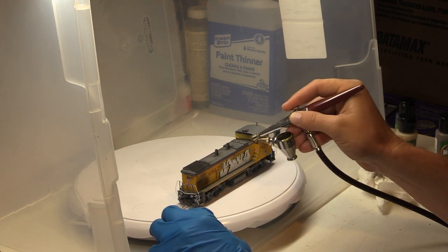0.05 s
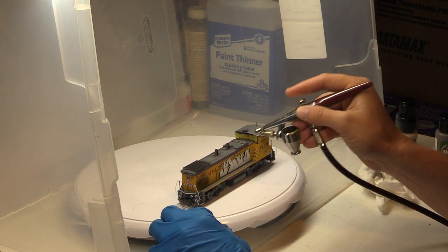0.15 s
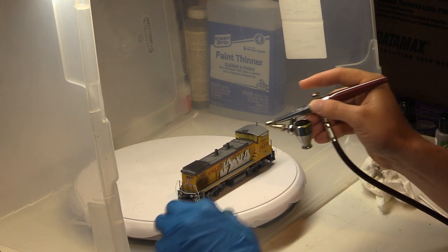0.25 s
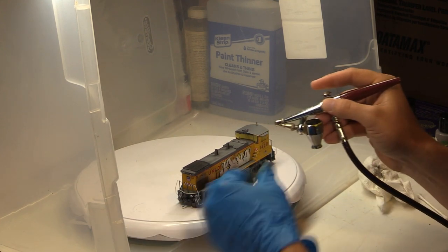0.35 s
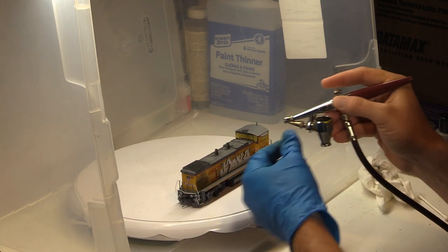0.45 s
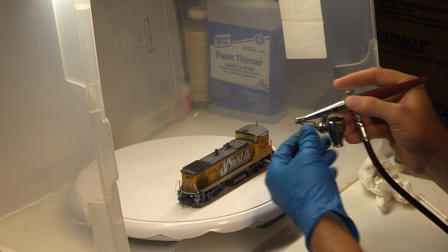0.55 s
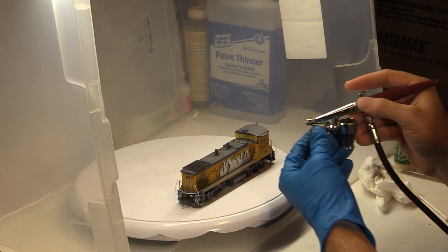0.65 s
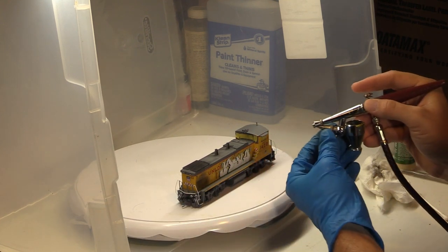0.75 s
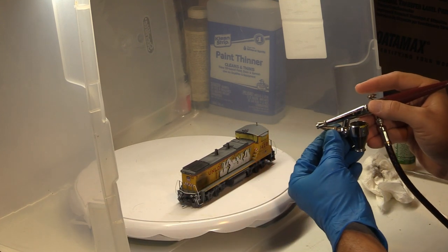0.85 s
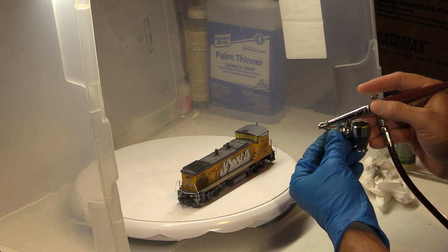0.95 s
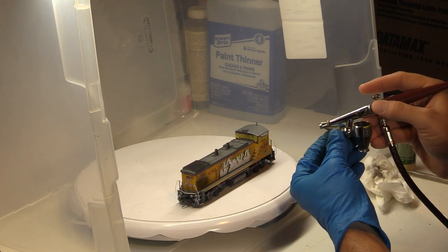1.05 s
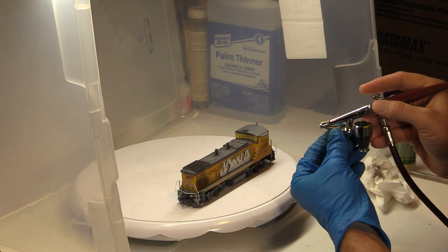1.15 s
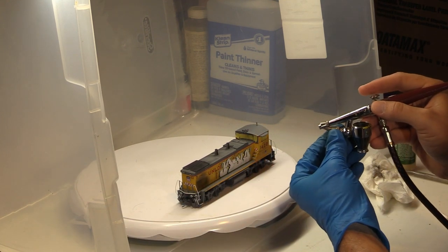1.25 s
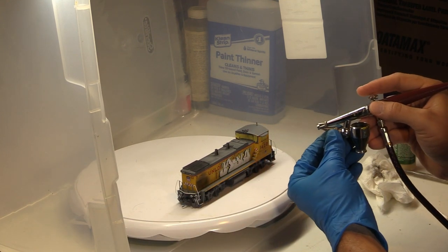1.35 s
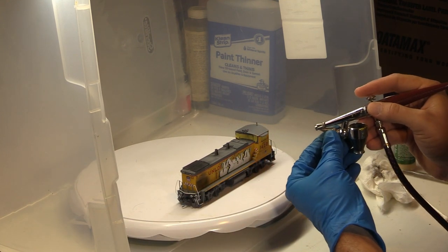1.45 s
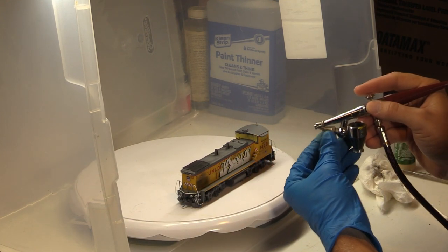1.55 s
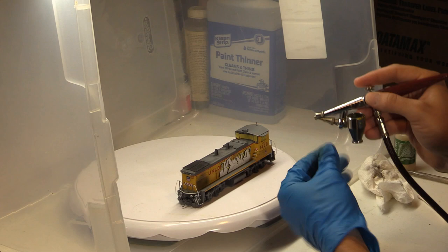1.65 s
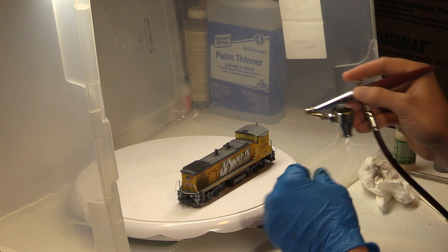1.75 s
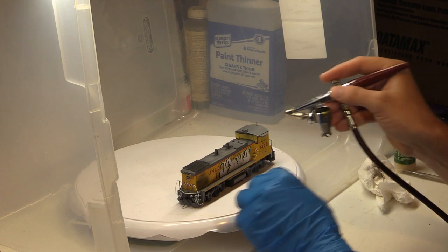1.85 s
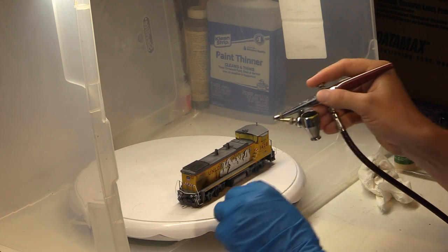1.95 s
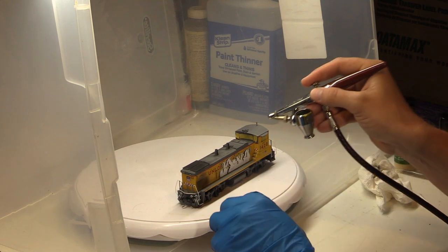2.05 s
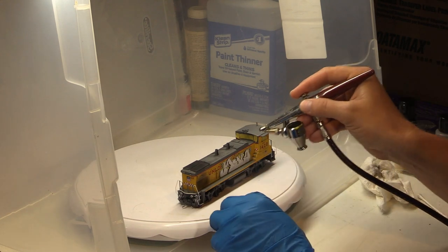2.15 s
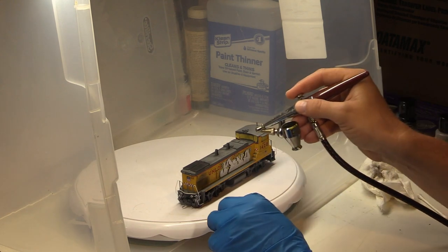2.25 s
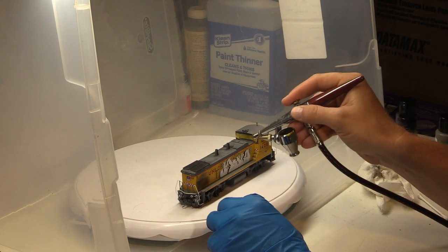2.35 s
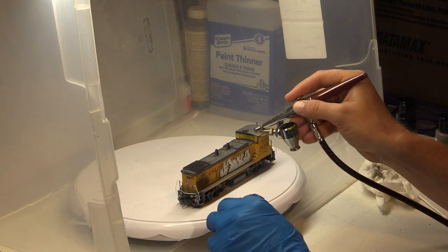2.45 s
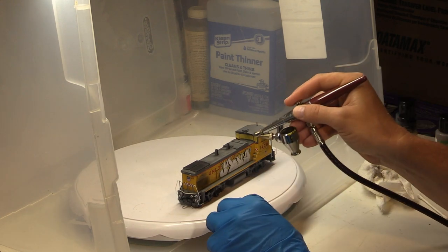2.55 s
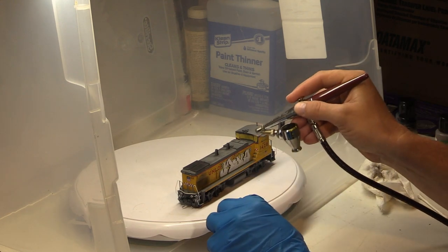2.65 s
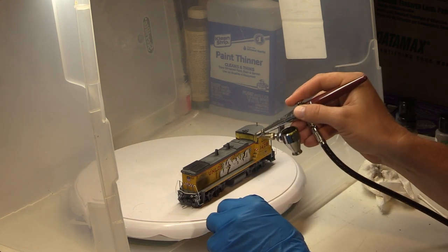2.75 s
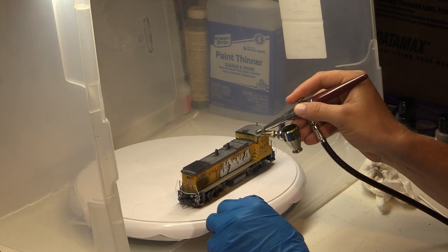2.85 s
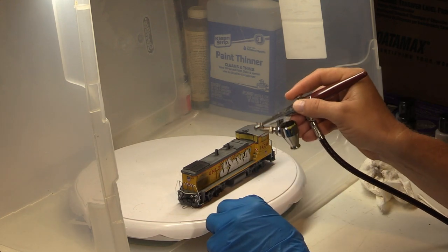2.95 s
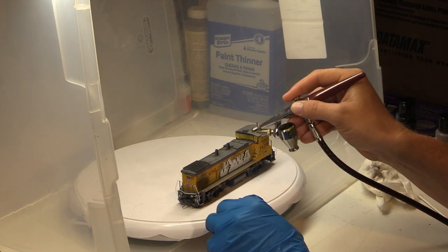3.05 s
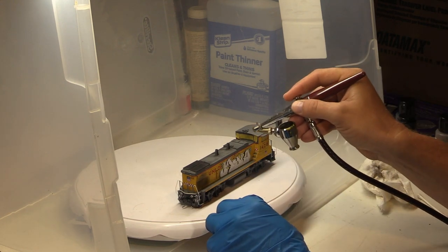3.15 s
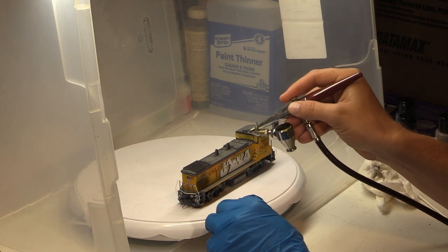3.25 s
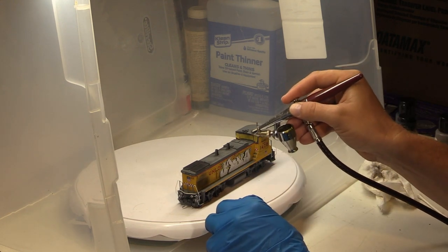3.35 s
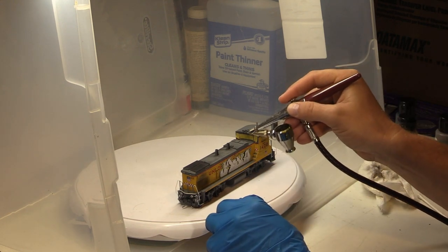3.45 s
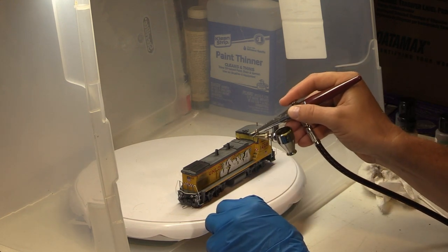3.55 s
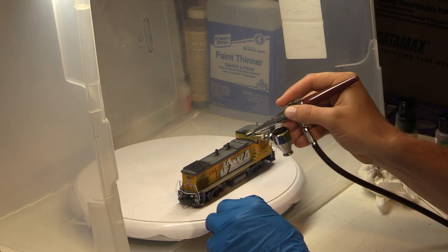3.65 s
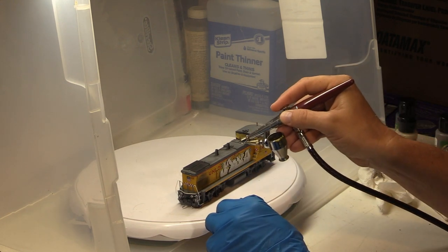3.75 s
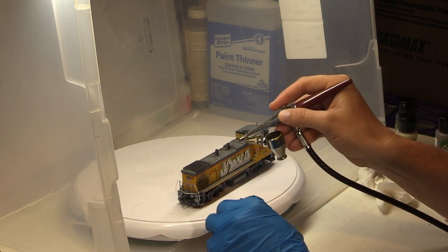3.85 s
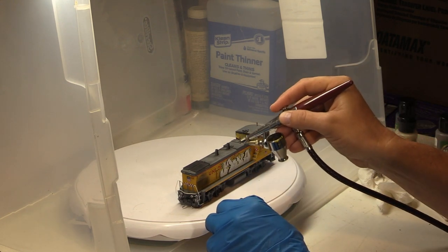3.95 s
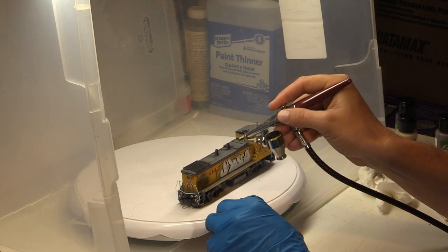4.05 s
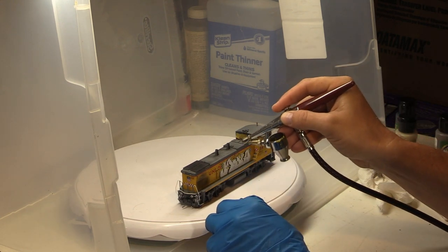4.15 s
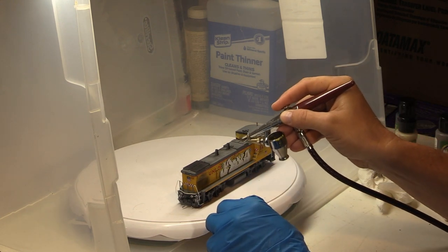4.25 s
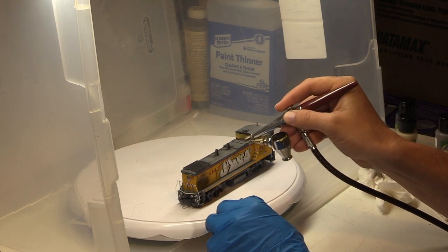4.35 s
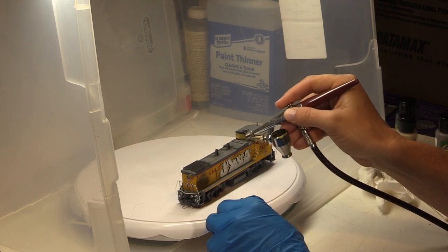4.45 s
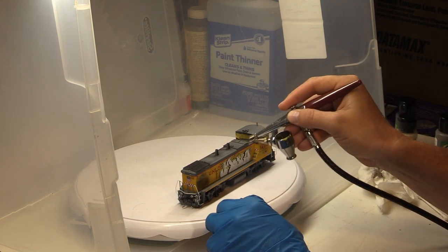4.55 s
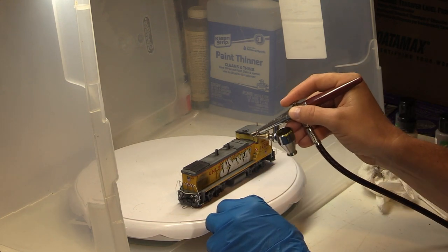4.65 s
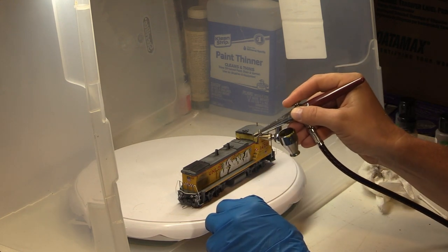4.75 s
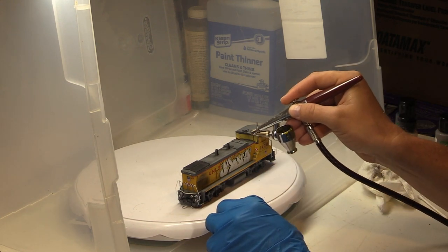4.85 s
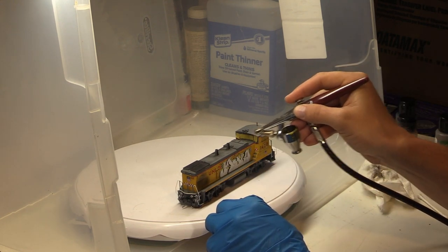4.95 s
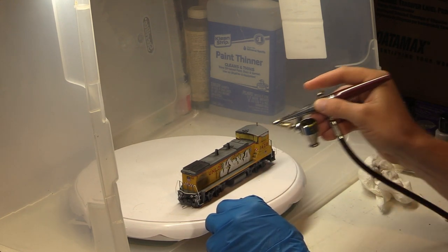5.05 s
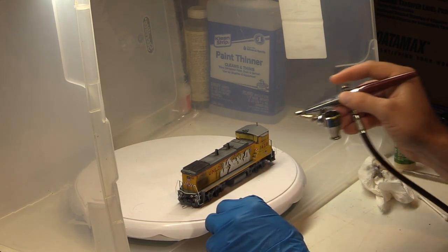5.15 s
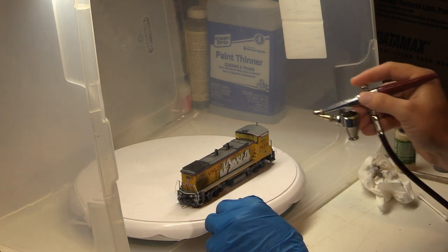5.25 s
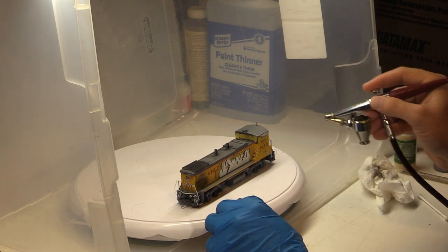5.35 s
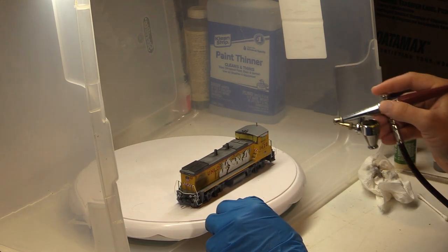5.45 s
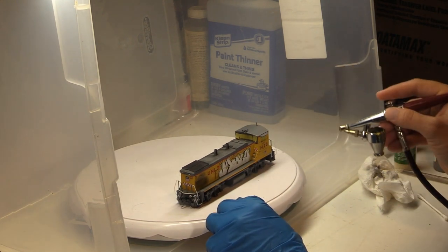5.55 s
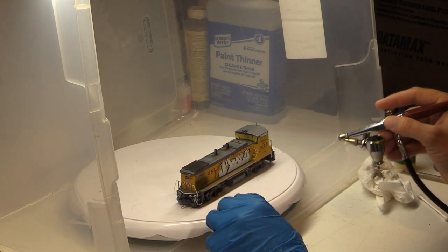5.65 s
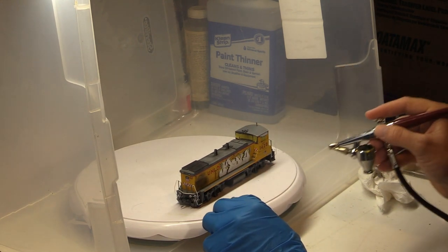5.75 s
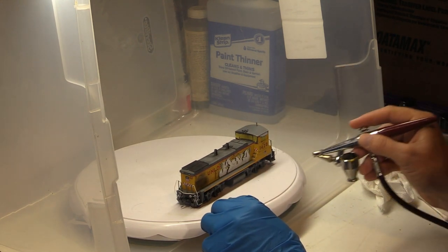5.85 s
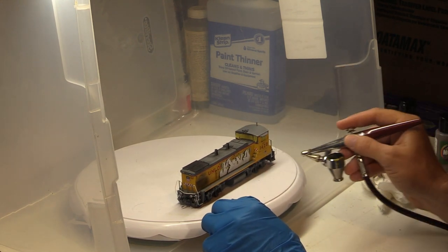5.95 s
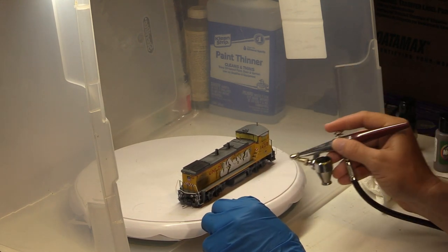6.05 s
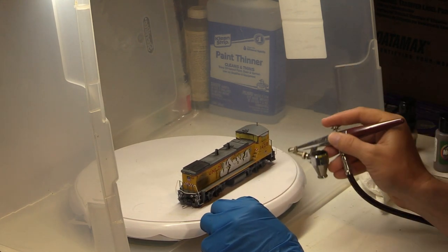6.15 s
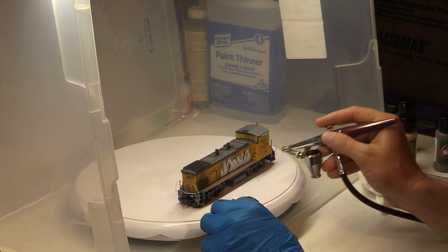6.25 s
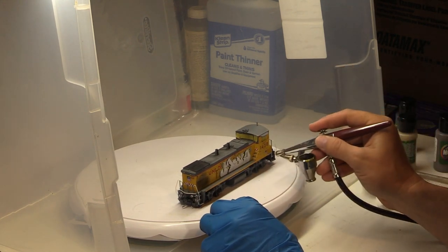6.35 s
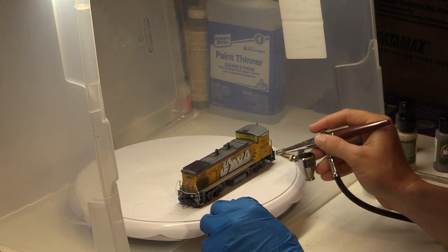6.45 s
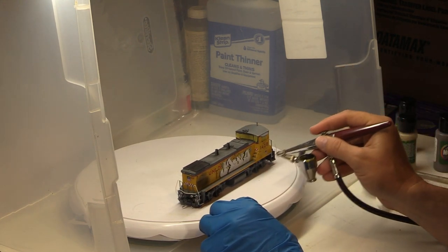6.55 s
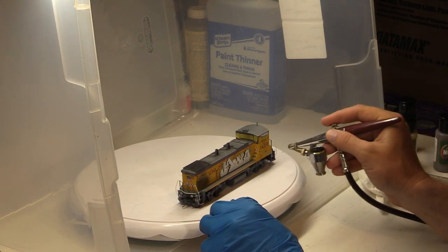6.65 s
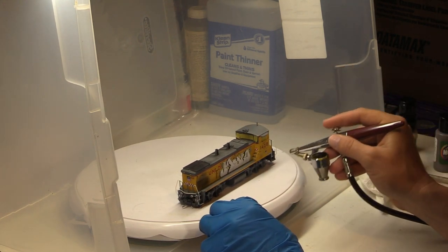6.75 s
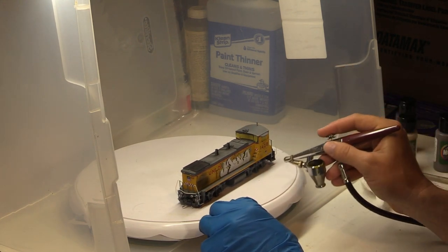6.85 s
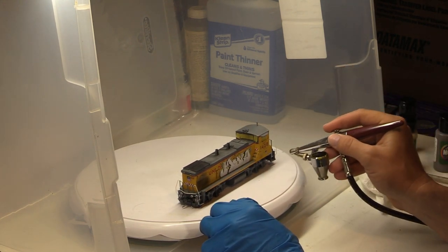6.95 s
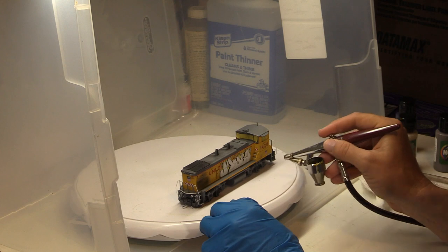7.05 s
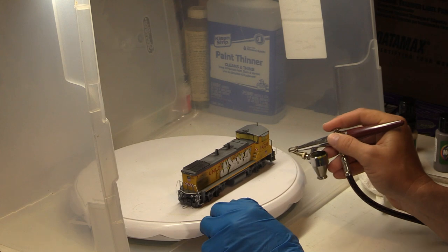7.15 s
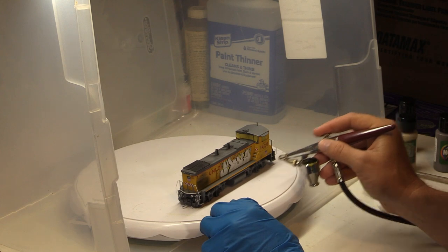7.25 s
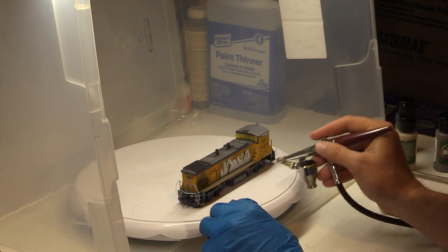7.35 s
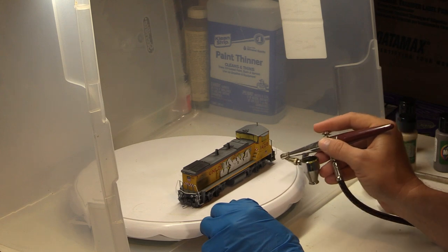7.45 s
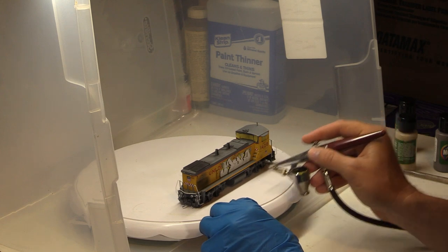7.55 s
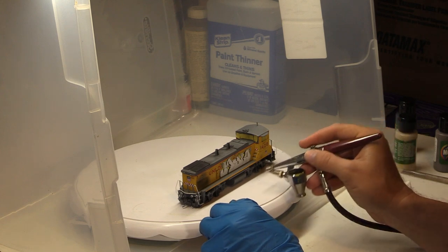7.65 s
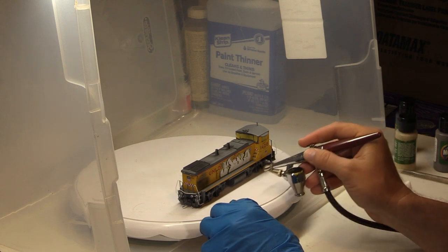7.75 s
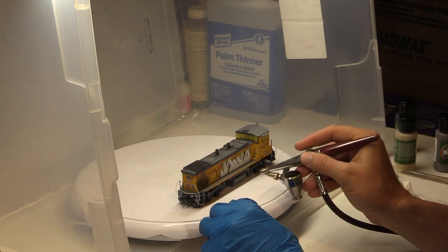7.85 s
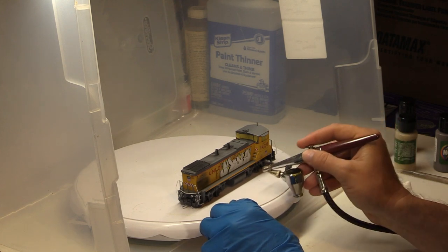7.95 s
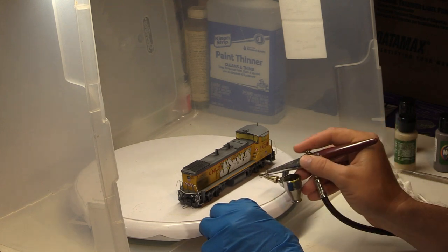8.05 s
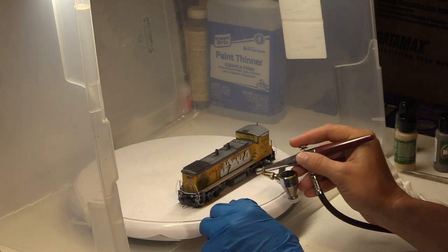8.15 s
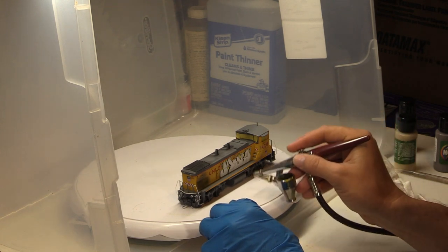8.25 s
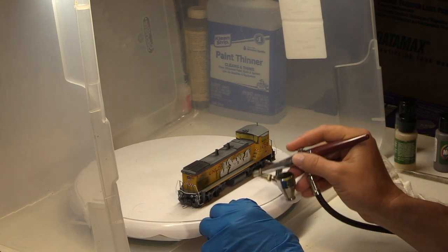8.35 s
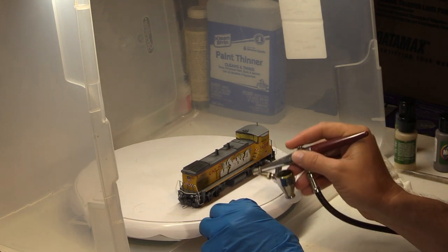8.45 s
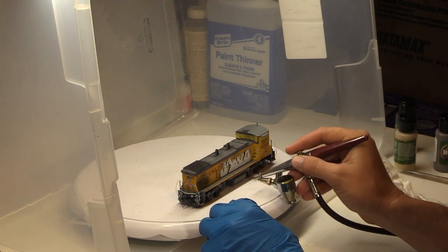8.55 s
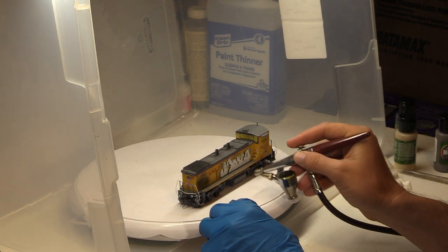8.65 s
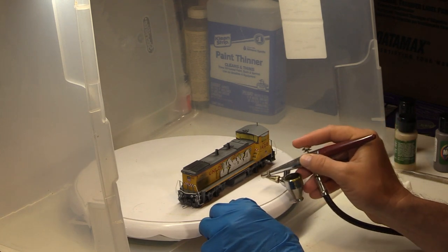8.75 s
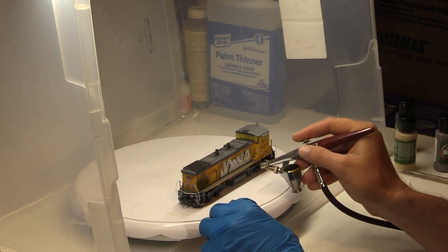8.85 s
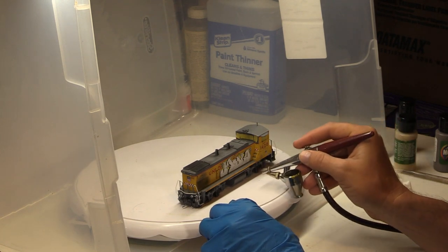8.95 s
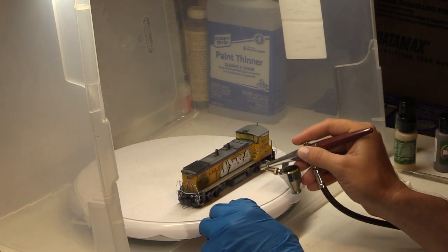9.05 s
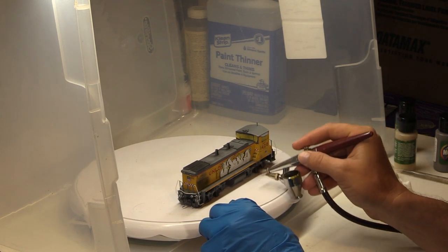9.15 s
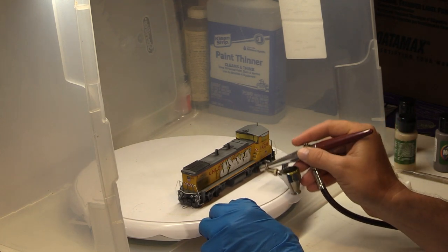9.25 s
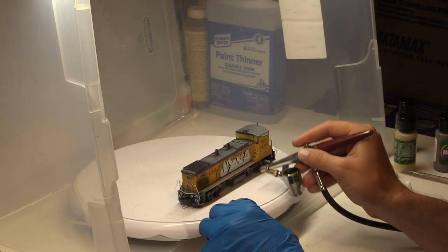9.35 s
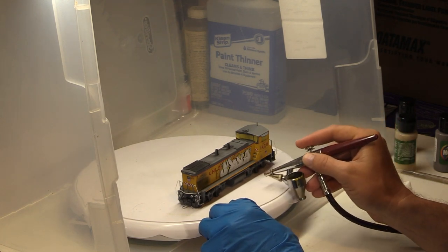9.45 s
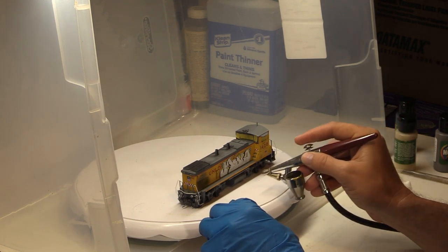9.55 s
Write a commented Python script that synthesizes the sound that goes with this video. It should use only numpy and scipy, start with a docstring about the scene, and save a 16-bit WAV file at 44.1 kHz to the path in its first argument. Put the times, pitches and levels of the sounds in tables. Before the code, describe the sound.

A small airbrush sprays a model in a plastic booth: a brief opening hiss, a pause, a long fluttering spray, then five short spurts. A fan rushes steadily; a little compressor buzzes on and off, each stop marked by a ringing click and tiny puff. Close indoor pickup, right channel only, the left nearly silent.

```python
"""An airbrush sprays a model in a plastic booth in seven bursts: shaped noise for nozzle hiss, splash,
low roar and whistle. Behind it an extractor fan rushes and hums; a small piston compressor, a sum of
shaft orders with clatter, runs until its pressure switch trips with a ringing click of the valve.
One microphone feeds the right channel; the left input is empty and only hisses."""
import sys
import numpy as np
from scipy import signal
from scipy.fft import rfft, irfft
from scipy.io import wavfile
from scipy.ndimage import uniform_filter1d

SR = 44100
rng = np.random.default_rng(int(sys.argv[2]) if len(sys.argv) > 2 else 0)


def wrap_up_sound(samples):
    """Save the sound to the file named by the first command line argument, as 16-bit audio."""
    columns = np.atleast_2d(samples).T
    # keep every value between -1 and 1, then stretch to whole-number steps
    tamed = np.clip(columns, -1, 1)
    steps = np.round(tamed * 32767).astype(np.int16)
    wavfile.write(sys.argv[1], SR, steps)


N = 423360
T = np.arange(N) / SR  # s
HOP = 128  # samples between short-time frames, each four hops long
HZ = np.fft.rfftfreq(4 * HOP, 1 / SR)[:, None]
FRAME_S = np.arange(N // HOP + 5) * HOP / SR

# All source levels stand ahead of the doubling in scene(); spectra in dB per Hz give the shape only.
# Airbrush, trigger down to trigger up. Each row: start in s, stop in s, valve opening time in s,
# nozzle hiss in dB, treble tilt in dB per octave, low roar in dB re hiss, whistle in dB re hiss.
BURSTS = [(0, 0.275, .017, -44.5, 3.5, -6, -12), (2.533, 5.17, 0.025, -46.5, -1, -7.5, -13),
          (6.594, 6.861, 0.013, -45, -3, -8, -16), (7.114, 7.612, 0.015, -44.5, -1.5, -6, -14),
          (7.774, 8.285, 0.02, -47, -1.7, -3.5, -13), (8.424, 8.87, 0.0068, -47, -1, -2.5, -19),
          (9.071, 9.596, 0.011, -46.5, -0.5, -4, -14)]
# Compressor runs. Each row: start in s, stop in s, tone level in dB,
# extra level in dB on the shaft orders below the 28th.
RUNS = [(0, 0.7, -60, 3.5), (3.12, 5.88, -60, 2), (7.471, 11, -59.5, 3)]


def gain_of(db):
    """Amplitude factor for a level in dB."""
    return 10 ** (np.asarray(db) / 20)


def evened(x):
    """The signal scaled to rms 1."""
    return x / np.sqrt(np.mean(x ** 2) + 1e-20)


def read(points, hz):
    """Value of a curve over frequency, straight between its points on a log axis."""
    f, value = np.transpose(points)
    return np.interp(np.log(hz + 1), np.log(f + 1), value)


def lift_db(peaks, hz):
    """Sum of resonance-shaped lifts in dB, each with its full width at half the lift."""
    return sum(db / (1 + (2 * (hz - f) / width) ** 2) for f, width, db in peaks)


def coloured(db_of_hz):
    """Steady noise of rms 1 with a finely resolved spectrum."""
    spectrum = rfft(rng.standard_normal(N))
    gain = gain_of(db_of_hz(np.fft.rfftfreq(N, 1 / SR)))
    return evened(irfft(spectrum * gain, N))


def wander(seconds):
    """Slow chance drift of rms 1: white noise averaged twice over the given time."""
    size = int(seconds * SR)
    once = uniform_filter1d(rng.standard_normal(N), size)
    return evened(uniform_filter1d(once, size))


def gate(start, stop, rise, fall):
    """1 from start to stop, with a straight rise and an exponential fall; a start at 0 is already open."""
    opening = np.clip((T - start) / rise + (start < .01), 0, 1)
    return opening * np.exp(-np.maximum(T - stop, 0) / fall)


def fan():
    """Broad rush of the extractor through its duct, swelling slightly, with a low hum."""
    # Rush at the microphone. Each row: frequency in Hz, level in dB per Hz.
    rush_curve = [(15, -23), (40, -8.5), (95, -5), (200, -5), (420, -2.5), (650, -2.5), (820, -5),
                  (950, -3), (1320, -0.5), (2200, -4.5), (3500, -4.5), (5300, -15), (7500, -21),
                  (15800, -23.5)]
    # Duct resonances. Each row: frequency in Hz, width in Hz, lift in dB.
    duct_tones = [(822, 6, 11), (1320, 60, 4), (1490, 40, 3), (1610, 40, 2)]
    # Low hum: frequency in Hz, level in dB.
    hum_setting = (30, -72)
    rush_db = -51
    hum_hz, hum_db = hum_setting
    hum = np.sqrt(2) * gain_of(hum_db) * np.sin(2 * np.pi * hum_hz * T)
    hum = hum * (1 + 0.34 * wander(.1))
    rush = coloured(lambda hz: read(rush_curve, hz) + lift_db(duct_tones, hz))
    return gain_of(rush_db + 0.87 * wander(0.11)) * rush + hum


def shaft_turns():
    """The shaft runs up, then slows a little as the tank pressure climbs."""
    # Top speed of each run, in turns per s.
    top_speeds = [27.01, 27.08, 27.06]
    run_up_s, run_up_lag = .14, .68  # s; turns per s short at the start
    sag_spraying, sag_shut = .015, .2  # turns per s per s, fastest with the trigger shut
    spraying = sum((T >= row[0]) & (T < row[1]) for row in BURSTS)
    sagged = np.cumsum(np.where(spraying, sag_spraying, sag_shut)) / SR
    speed = np.zeros(N)
    for (start, *_), top in zip(RUNS, top_speeds):
        lag = run_up_lag * np.clip(1 - (T - start) / run_up_s, 0, 1) * (start > 0)
        sag = sagged - sagged[round(start * SR)]
        speed = np.where(T >= start, top - lag - sag, speed)
    return np.cumsum(speed * (1 + 0.00097 * wander(0.057))) / SR


def compressor():
    """One piston blow a turn rings the casing; winding hum, and valve clatter that puffs once a turn."""
    # Shaft orders heard, in multiples of the turning rate.
    orders = [13, 15, 17, 24, 25, 26, 27, 28, 29, 36, 37, 38]
    # What the casing passes of each of these orders, in dB re the tone level of the run,
    # before the run and strain settings.
    order_levels = [-22, -11.5, -33, -15.5, -17, -13, -5, 1, -11.5, -10.5, -15, -10.5]
    # Valve clatter. Each row: frequency in Hz, level in dB per Hz.
    clatter_curve = [(250, -17), (450, -2.5), (750, 7), (1100, -5), (2000, 3), (4000, -21.5)]
    # Winding hum: frequency in Hz, level in dB.
    winding_hum = (120, -76.5)
    strain_s, strain_held_s = 0.24, 0.26  # the tone grows, then holds until the switch trips
    strain_db, strain_lower_db = 4, -7  # under strain the orders below the 28th fall behind
    turns, waver_db = shaft_turns(), 0.61 * wander(0.15)
    lower, upper = np.zeros(N), np.zeros(N)
    for k, order_db in zip(orders, order_levels):
        phase_turns = .11 * (k - 28) ** 2  # nearly in step, so the tone throbs
        order = gain_of(order_db) * np.sin(2 * np.pi * (k * turns + phase_turns))
        if k < 28:
            lower += order
        else:
            upper += order
    clatter = coloured(lambda hz: read(clatter_curve, hz)) * (1 + 0.22 * np.cos(2 * np.pi * turns))
    hum_hz, hum_db = winding_hum
    hum = np.sqrt(2) * gain_of(hum_db) * np.sin(2 * np.pi * hum_hz * T)
    steady = hum + gain_of(-57.5) * clatter
    out = np.zeros(N)
    for start, stop, db, lower_db in RUNS:
        strain = np.clip(1 - (stop - strain_held_s - T) / strain_s, 0, 1)
        blend = upper + gain_of(lower_db + strain_lower_db * strain) * lower
        tone = np.sqrt(2) * gain_of(db + strain_db * strain + waver_db) * blend
        out += tone * gate(start, stop, rise=0.03, fall=0.059)
        out += steady * gate(start, stop, rise=0.058, fall=0.053)
    return out


def valve():
    """The pressure switch snaps, bounces once, rings in decaying modes and lets out a short puff."""
    # Clicks. Each row: time in s, level in dB.
    clicks = [(0.7084, -32.5), (5.881, -33.5)]
    # Ringing modes of the valve. Each row: frequency in Hz, level in dB re the click, 60 dB decay in s.
    modes = [(1860, -9, .02), (4040, 0, 0.025), (4270, -14.5, .1), (5100, -2, 0.011), (5560, -4.5, 0.014),
             (7340, -17.5, 0.071), (7670, -18, 0.16), (8320, -18, .08), (9890, -21, .14), (11010, -22, .12),
             (13040, -14, 0.09), (13320, -23, 0.081)]
    t, out = T[:SR // 4], np.zeros(N)
    for s, db in clicks:
        ring = sum(gain_of(mode_db - 60 * t / t60) * np.sin(2 * np.pi * hz * t)
                   for hz, mode_db, t60 in modes)
        ring = ring * np.minimum(t / 0.0012, 1)
        bounce = 0.31 * np.roll(ring, round(0.0041 * SR)) * (t > .0045)
        hiss = np.convolve(rng.standard_normal(len(t)), [1, 0, -1], "same")
        puff = 0.098 * hiss * gain_of(-60 * t / 0.21)
        out[round(s * SR):][:len(t)] += gain_of(db) * (ring + bounce + puff)
    return out


def booth(x, wet_db):
    """A short tail of random taps follows the sound off the booth, treble dying first."""
    # Booth decay. Each row: frequency in Hz, 60 dB decay in s.
    decay_curve = [(1000, 0.23), (5000, 0.21), (15000, 0.16)]
    taps = rng.choice([-1., 1.], SR // 3) * (rng.random(SR // 3) < .1)
    hz, t, z = signal.stft(taps, SR, nperseg=128)
    decay_db = -60 * t / read(decay_curve, hz)[:, None]
    tail = signal.istft(z * gain_of(decay_db), SR, nperseg=128)[1]
    return x + gain_of(wet_db) * signal.oaconvolve(x, tail / np.linalg.norm(tail))[:N]


def unit(db):
    """Gains of a spectrum with power 1 in every frame."""
    gain = gain_of(db)
    return gain / np.sqrt(np.mean(gain ** 2, axis=0))


def noise(gain, patchy_db):
    """Random short-time spectra under the given gains, with drifting patches."""
    a, b, patches = rng.standard_normal((len(FRAME_S), len(HZ), 3)).T
    patches = uniform_filter1d(patches, size=3, axis=0)  # across frequency
    patches = evened(uniform_filter1d(patches, size=20, axis=1))  # across time
    spectra = a + 1j * b
    white = signal.istft(spectra, nperseg=4 * HOP, noverlap=3 * HOP)[1]
    shaped_spectra = spectra * gain * gain_of(patchy_db * patches)
    shaped = signal.istft(shaped_spectra, nperseg=4 * HOP, noverlap=3 * HOP)[1]
    return shaped[:N] / white.std()


def humps(rows):
    """Bell-shaped lifts in dB, frame by frame."""
    return sum(db * np.exp(-((FRAME_S - s) / half) ** 2) for s, db, half in rows)


def burst_at(s):
    """Number of the burst that is under way, has just ended or starts within 50 ms."""
    return np.maximum(np.searchsorted([row[0] - .05 for row in BURSTS], s) - 1, 0)


def with_peaks(jet):
    """Peaks in the spectrum of each burst lift their bands, each coming and going by itself."""
    # Narrow and broad peaks heard in each burst: model hollows, booth reflections, whistle.
    # One table a burst. Each row: frequency in Hz, width in Hz, mean lift in dB.
    peak_tables = [
        [(2500, 200, 1.5), (3400, 350, 2), (4270, 700, 1), (12600, 900, 1.5)],
        [(1440, 76, 2), (2300, 350, 4), (2620, 52, 6), (2925, 77, 6.5), (3270, 140, 5.5), (3620, 220, 6),
         (11380, 90, 7), (12200, 100, 1), (14300, 900, 2.5), (15600, 300, 5)],
        [(2240, 150, 6.5), (3070, 110, 6.5), (3320, 135, 11), (4830, 200, 4)],
        [(2300, 110, 5), (2640, 100, 4.5), (3040, 100, 6), (3240, 130, 8.5), (3640, 270, 6), (4220, 90, 0),
         (14200, 1000, 3)],
        [(2000, 150, 2.5), (3210, 140, 7.5), (3550, 220, 6), (14900, 810, 6)],
        [(2050, 150, 7.5), (3230, 90, 3), (3500, 280, 6), (4440, 230, 2.5), (5050, 100, 2), (7900, 200, 6),
         (15650, 150, 6)],
        [(2300, 110, 6), (2630, 64, 4), (3050, 72, 11.5), (3400, 120, 7), (3590, 130, 8), (4230, 92, 4),
         (6490, 180, 7), (7460, 260, 7), (11400, 100, 7)],
    ]
    waver, waver_s = 0.21, 0.052  # rms share of the lift; averaging in s
    hz, t, z = signal.stft(jet, SR, nperseg=2048, noverlap=1536)
    which, db = burst_at(t), np.zeros(z.shape)
    frames = max(int(waver_s / t[1]), 1)
    for k, table in enumerate(peak_tables):
        chance = uniform_filter1d(rng.standard_normal((len(table), len(t))), frames, axis=1)
        depth = np.maximum(1 + waver * evened(chance), 0) * (which == k)
        db += np.transpose([lift_db([row], hz) for row in table]) @ depth
    return signal.istft(z * gain_of(db), SR, nperseg=2048, noverlap=1536)[1][:N]


def airbrush():
    """Turbulent hiss at the nozzle, the jet splashing on edges of the model, a low roar, a breathy whistle."""
    # Nozzle hiss. Each row: frequency in Hz, level in dB per Hz before the treble tilt.
    nozzle_curve = [(1500, -40), (2500, -9.5), (3700, -10), (4500, -8), (6200, -10), (8000, -7.5),
                    (11000, -4.5), (13000, -4.5), (14500, -1.5), (15700, -4.5)]
    # Splash on the model. Each row: distance from the centre frequency in Hz, level in dB.
    splash_curve = [(-2500, -35), (-1300, -12), (-500, -1), (0, -1), (498, -0.5), (1300, -5.5),
                    (3500, -14.5), (8000, -15.5)]
    # Low roar. Each row: frequency in Hz, level in dB per Hz.
    roar_curve = [(300, -15.5), (700, -11), (1000, -6.5), (1300, -2), (1600, -5), (2200, -1.5), (3500, -33)]
    # How unevenly the jet sputters. Each row: frequency in Hz, spread in dB.
    patchy_curve = [(900, 1), (2000, 1.5), (4000, 1), (7000, 2), (14000, 1)]
    # The jet splashes on the model as the aim sweeps, one curve a burst.
    # Each row: time in s, splash level in dB, centre frequency in Hz.
    aim_curves = [
        [(0, -48, 3000), (.055, -43, 2920), (.1, -45.5, 2900), (.17, -44.5, 3370), (.215, -46, 2830),
         (.283, -41.5, 2830)],
        [(2.54, -52, 2700), (2.61, -48, 2990), (2.65, -58, 2800), (2.7, -49.5, 2860), (2.82, -54.5, 2750),
         (2.94, -45.5, 2740), (3.02, -54, 2750), (3.1, -47.5, 2790), (3.19, -64, 2800), (3.33, -50, 2760),
         (3.45, -59, 2850), (3.56, -46.5, 2930), (3.7, -56.5, 2700), (3.81, -47, 2870), (3.86, -54, 2900),
         (3.9, -49, 2900), (3.96, -53.5, 2550), (4.05, -49, 2950), (4.1, -49.5, 2430), (4.2, -48.5, 2860),
         (4.31, -49.5, 2480), (4.46, -48, 2930), (4.51, -50.5, 2630), (4.7, -50, 2650), (4.9, -50.5, 2750),
         (5.08, -47.5, 2900), (5.17, -58, 2900)],
        [(6.6, -43, 3300), (6.665, -48, 3200), (6.72, -34, 3230), (6.755, -35.5, 3000), (6.78, -47.5, 3100),
         (6.863, -49.5, 3230)],
        [(7.12, -44.5, 3200), (7.27, -48.5, 3260), (7.43, -43, 3240), (7.49, -43, 2950), (7.55, -47, 3200),
         (7.615, -46, 3090)],
        [(7.79, -53.5, 2700), (7.876, -48.5, 3260), (7.926, -35.5, 3400), (7.97, -52, 3350),
         (8.03, -43.5, 3080), (8.15, -50.5, 3250), (8.245, -47.5, 3080), (8.29, -44.5, 2710)],
        [(8.43, -43, 3000), (8.475, -41.5, 3220), (8.5, -47.5, 3200), (8.59, -40.5, 2860), (8.63, -38, 3360),
         (8.74, -45.5, 2900), (8.83, -41, 3180), (8.875, -40.5, 3300)],
        [(9.08, -47.5, 3450), (9.13, -39, 3380), (9.19, -40.5, 3280), (9.25, -41.5, 3200), (9.285, -39.5, 3280),
         (9.36, -40.5, 3250), (9.39, -55, 3070), (9.47, -42, 3280), (9.6, -44.5, 3370)],
    ]
    # The hiss swells and dulls for a moment. Each row: time in s, lift in dB, half length in s.
    swells = [(6.68, 1.5, 0.077), (7.43, 0, .05), (7.6, 2, .03), (7.97, 2.5, .04), (8.15, 3.5, 0.046),
              (8.63, 5.5, 0.037), (9.11, 5, 0.024), (9.29, 2.5, 0.044), (9.52, 6, 0.057)]
    # The nozzle whistle flares. Each row: time in s, lift in dB, half length in s.
    flares = [(.165, 12, 0.029), (3.25, 10, .02), (3.335, 9, .03), (3.44, 10, .022), (3.555, 10, .022),
              (3.645, 16, 0.033), (3.81, 5, .025), (4.04, 7, .025), (4.24, 14, 0.028), (5.08, 13, .025),
              (7.43, 3, .03)]
    whistle_hz, whistle_width_hz = 12100, 860  # 6 dB down one width from the centre
    surge_db, surge_s = 1, .03  # hose pressure built up at rest drains after the trigger opens
    dulling = 1.05  # dB per octave of tilt lost for each dB of swell
    hiss_with_flare, roar_follows = .12, .4  # dB per dB of flare; dB per dB of the splash's swings

    which = burst_at(FRAME_S)
    start, _, _, hiss_db, tilt_db, roar_re_hiss_db, whistle_re_hiss_db = np.transpose(BURSTS)[:, which]
    s, *aim = np.concatenate(aim_curves).T
    splash_db, centre_hz = (np.interp(FRAME_S, s, column) for column in aim)
    usual_db = np.array([np.mean(rows, axis=0)[1] for rows in aim_curves])[which]
    drain_db = surge_db * np.exp(-np.maximum(FRAME_S - start, 0) / surge_s) * (start > 0)
    swell_db, flare_db = humps(swells), humps(flares)

    roar_db = hiss_db + roar_re_hiss_db + roar_follows * (splash_db - usual_db)
    whistle_db = hiss_db + whistle_re_hiss_db + flare_db
    hiss_db = hiss_db + drain_db + swell_db + hiss_with_flare * flare_db

    octaves = np.log2(np.maximum(HZ, 4000) / 10000)
    nozzle = unit(read(nozzle_curve, HZ) + (tilt_db - dulling * swell_db) * octaves)
    splash = unit(np.interp(HZ - centre_hz, *np.transpose(splash_curve)))
    roar = unit(read(roar_curve, HZ))
    whistle = unit(-20 * np.log10(1 + ((HZ - whistle_hz) / whistle_width_hz) ** 2))
    layers = [(hiss_db, nozzle), (splash_db, splash), (roar_db, roar), (whistle_db, whistle)]
    power = sum((gain_of(db) * spectrum) ** 2 for db, spectrum in layers)

    # the jet flaps as it crosses edges
    gusts = evened(uniform_filter1d(rng.standard_normal(len(FRAME_S)), size=4))
    jet = noise(np.sqrt(power) * gain_of(0.43 * gusts), read(patchy_curve, HZ))
    trigger = sum(gate(*row[:3], fall=0.011) for row in BURSTS)
    return with_peaks(jet * trigger)


def scene():
    """The microphone's signal on the right, nothing on the left."""
    background = fan() + compressor() + booth(valve(), wet_db=-4.5)
    sound = background + booth(airbrush(), wet_db=-10.0)
    return np.array([0 * sound, 2 * sound])


def record(dry):
    """The level dips briefly twice; both inputs add their own faint hiss; then the band limit."""
    # The level drops at once and climbs back. Each row: time in s, depth in dB, recovery time constant in s.
    dips = [(.0668, 16, .009), (8.0668, 14, .009)]
    # Hiss of an input. Each row: frequency in Hz, level in dB per Hz.
    input_curve = [(20, 5), (400, -1), (15000, -1)]
    input_db, edge_hz = -75.5, 15770
    dip_db = sum(db * (T > s) * np.exp(-np.maximum(T - s, 0) / back) for s, db, back in dips)
    hiss = [gain_of(input_db) * coloured(lambda hz: read(input_curve, hz)) for side in dry]
    heard = dry / gain_of(dip_db) + hiss
    low_pass = signal.firwin(1023, edge_hz, window=("kaiser", 9), fs=SR)
    return signal.oaconvolve(heard, low_pass[None], "same")


dry = scene()
out = record(dry)
wrap_up_sound(out)
```